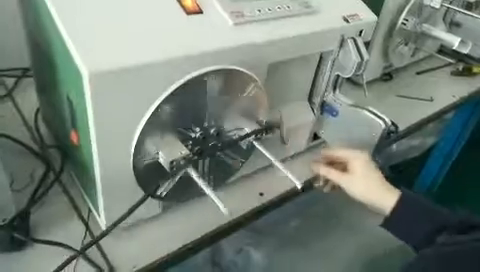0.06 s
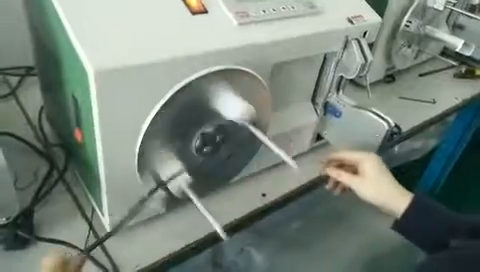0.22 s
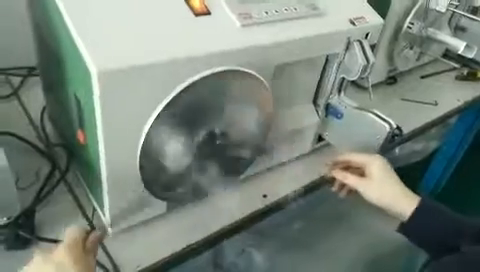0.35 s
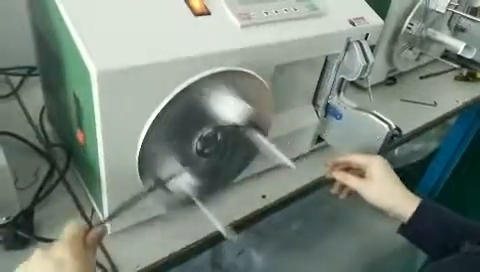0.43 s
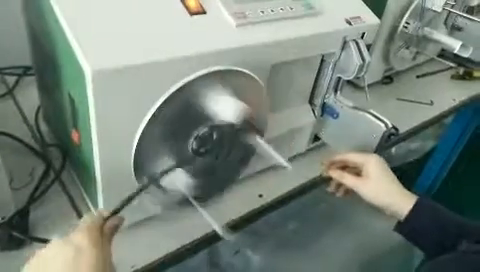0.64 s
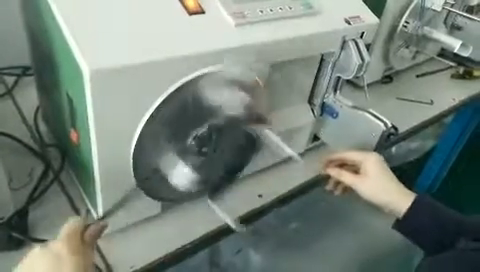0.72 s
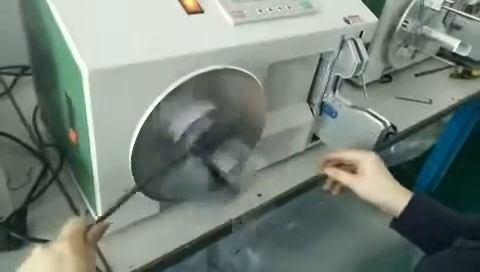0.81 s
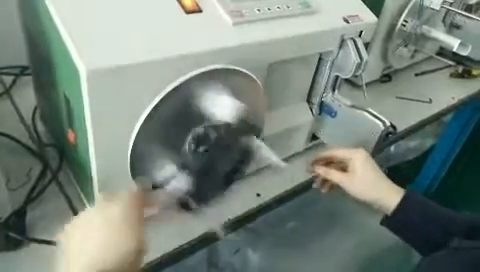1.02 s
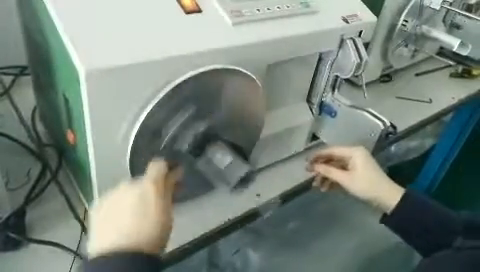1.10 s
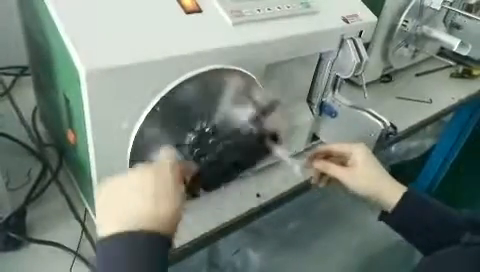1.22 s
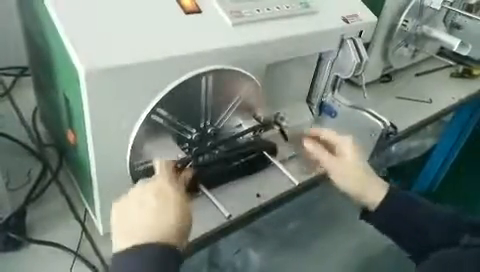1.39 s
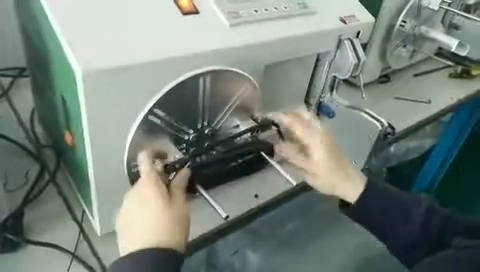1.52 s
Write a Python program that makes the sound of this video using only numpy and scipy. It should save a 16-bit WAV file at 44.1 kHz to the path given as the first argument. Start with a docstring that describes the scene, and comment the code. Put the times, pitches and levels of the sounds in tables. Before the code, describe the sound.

Quick metallic clacking and motor whine from a cable winding machine that runs briefly and stops.

```python
"""A benchtop cable winder ramps up, runs at five turns a second and brakes to a stop.
Its motor and gears whine at multiples of the shaft rate, forcing the cabinet's panels to resonate.
Twice a turn the loose steel arm clacks, hard and soft in turn, and excites the cabinet's low modes.
Friction makes the cable hiss through the hand and brush the coil. The winding head ticks,
a last light click comes as a hand reaches the arm, and the workshop reverberates."""
import sys
import numpy as np
from scipy import signal
from scipy.io import wavfile

SR = 44100
rng = np.random.default_rng(int(sys.argv[2]) if len(sys.argv) > 2 else 0)


def file_out(sig):
    """Save sig as 16-bit WAV at sys.argv[1]."""
    # one column per channel
    cols = np.atleast_2d(sig).T
    # limit, then scale
    lim = np.clip(cols, -1, 1)
    pcm = np.round(lim * 32767).astype(np.int16)
    wavfile.write(sys.argv[1], SR, pcm)


N = 68355
TIME = np.arange(N) / SR


def from_db(db):
    """Amplitude ratio of a level in decibels."""
    return 10 ** (np.asarray(db) / 20)


def rms_one(x):
    """Normalisation to unit rms."""
    return x / np.sqrt(np.mean(x ** 2) + 1e-20)


def at_hz(points, hz):
    """Interpolation on a log-frequency axis."""
    frequencies, values = np.transpose(points)
    return np.interp(np.log(np.maximum(hz, 1)), np.log(frequencies), values)


def drift(rate_hz):
    """Random modulation: low-passed noise of unit rms."""
    r = np.exp(-80 * np.pi * rate_hz / SR)
    slow = signal.lfilter([1], [1, -2 * r, r * r], rng.standard_normal(N // 40 + 2002))[2000:]
    return np.interp(np.arange(N) / 40, np.arange(len(slow)), rms_one(slow))


def ring(x, hz, t60_s):
    """Damped oscillator: a unit impulse starts a decaying sine of amplitude 1."""
    r, w = from_db(-60 / (t60_s * SR)), 2 * np.pi * hz / SR
    return signal.lfilter([0, np.sin(w)], [1, -2 * r * np.cos(w), r * r], x + 1e-18)


def resonate(x, hz, width_hz):
    """Band-pass resonance with unit peak gain."""
    r, w = np.exp(-np.pi * width_hz / SR), 2 * np.pi * hz / SR
    return signal.lfilter(np.array([1, 0, -1]) * (1 - r * r) / 2, [1, -2 * r * np.cos(w), r * r], x)


def dulled(x, top_hz):
    """Low-pass filtering."""
    return signal.sosfilt(signal.butter(4, top_hz, fs=SR, output="sos"), x + 1e-18)


def dying(start_s, fall_s):
    """Exponential decay from a sudden onset."""
    return (TIME >= start_s) * np.exp(-np.abs(TIME - start_s) / fall_s)


def scuff(start_s, length_s):
    """Half-Gaussian envelope: a contact holds briefly and lets go."""
    return (TIME >= start_s) * np.exp(-((TIME - start_s) / length_s) ** 2)


def late(x, lag_s):
    """Propagation delay."""
    return np.interp(TIME - lag_s, TIME, x, left=0)


def placed(x, lag_s=0.000099):
    """Path difference: the machine stands slightly right, so the left channel lags."""
    return np.array([late(x, lag_s), x])


# likeness of left and right: frequency_hz, correlation
STEREO_CORRELATION = [(100, 1), (300, 0.89), (600, 0.89), (1000, 0.27), (1600, -0.47), (3000, -0.18),
                      (5000, -0.079), (12000, 0.039)]

def noise(spectrum, flicker_db=0):
    """Partially coherent stereo noise of unit rms; each third-octave band can flicker on its own."""
    edges = 22 * 2 ** (np.arange(30) / 3)
    out, white = 0, rng.standard_normal((2, 2, N))
    for k, (low, high) in enumerate(zip(edges, edges[1:])):
        band = signal.butter(2, [low, high], "band", fs=SR, output="sos")
        mid, side = signal.sosfilt(band, white[k % 2])
        hz = np.sqrt(low * high)
        alike = np.clip(at_hz(STEREO_CORRELATION, hz), -.99, .99)
        gain = from_db(at_hz(spectrum, hz) + flicker_db * drift(5.3))
        out = out + gain * (np.sqrt(1 + alike) * mid + np.sqrt(1 - alike) * side * [[1], [-1]])
    return rms_one(out)


# workshop background: frequency_hz, density_db
BACKGROUND_SPECTRUM = [(25, -37), (55, 13), (120, 14.5), (280, 18.5), (400, 14.5), (800, 13), (1600, -4),
                       (5500, 3), (9000, -10.5), (16000, -25)]

def background():
    """Ambient noise: a faint, broadband floor."""
    return from_db(-50) * noise(BACKGROUND_SPECTRUM, flicker_db=3)


# cable sliding through the hand: time_s, level_db
SLIDE_LEVELS = [(0, -43), (.05, -36), (.21, -46), (.28, -34), (.44, -37), (.75, -35.5), (1.0, -36.5),
                (1.12, -45), (1.27, -32.5), (1.34, -57), (1.44, -46.5), (1.5, -79)]
# cable brushing the coil: peak_s, level_db, rise_s, fall_s
COIL_BRUSHES = [(0.38, -28.5, 0.012, 0.0076), (0.591, -30.5, 0.003, 0.0095), (1.061, -25.5, 0.036, 0.041),
                (1.165, -45, 0.0017, 0.0084), (1.205, -29, 0.0075, 0.0076), (1.387, -33.5, 0.01, 0.015)]
# friction hiss: frequency_hz, density_db
HISS_SPECTRUM = [(400, -12.5), (1000, -1), (1700, -3.5), (3200, -1.5), (4000, -1), (5600, 2.5),
                 (7500, -14.5), (10000, -16.5), (15000, -25.5)]

def cable():
    """Sliding friction: a grainy hiss in which hand and coil contacts add in power."""
    slide = from_db(np.interp(TIME, *np.transpose(SLIDE_LEVELS)))
    brushes = sum(from_db(db) * np.exp(-np.maximum((peak_s - TIME) / rise_s, (TIME - peak_s) / fall_s))
                  for peak_s, db, rise_s, fall_s in COIL_BRUSHES)
    grain = from_db(1.9 * drift(210))
    return np.hypot(slide, brushes) * grain * noise(HISS_SPECTRUM, flicker_db=3)


# gear tones at full speed: cycles_per_motor_turn, level_db
GEAR_TONES = [(18, -41.5), (20, -38.5), (40, -56)]

def gear_whine(angle, speed):
    """Periodic tooth contact: harmonics of the motor's rotation grow with the square of its speed."""
    tones = sum(from_db(db + 1.7 * drift(35)) * np.sin(order * angle) for order, db in GEAR_TONES)
    whine = np.sqrt(2) * tones * speed ** 2
    return np.array([late(whine, lag_s=0.00044), from_db(-4) * whine])


# thin motor tones: cycles_per_motor_turn, level_db
MOTOR_TONES = [(155, 0.5), (310, -14)]
# how well they radiate: frequency_hz, gain_db
MOTOR_RADIATION = [(300, -65), (900, -45.5), (1400, -43.5), (2200, -53.5), (3300, -33.5), (5000, -40.5),
                   (7750, -54), (16000, -46)]

def motor_whistle(angle, shaft_hz):
    """Radiation efficiency varies with frequency, so the tones swell and fade as they glide."""
    whistle = 0
    for order, db in MOTOR_TONES:
        gain = from_db(db + at_hz(MOTOR_RADIATION, order * shaft_hz) + 2 * drift(60))
        whistle += gain * np.sin(order * angle + drift(110))
    return np.sqrt(2) * whistle * (shaft_hz > 0)


# shaking by the gears, strongest under the load of the ramps: time_s, gain_db
MESH_LOAD = [(.15, -14), (.18, 3), (.22, 6), (.248, 9.5), (.272, 15), (.295, -32), (.45, -3), (1.015, 0.5),
             (1.04, 11), (1.07, 9), (1.11, 2.5)]

def gear_mesh(angle, speed, teeth=20, jitter_rad=.55):
    """Phase and amplitude modulation roughen the meshing force that shakes the panels."""
    phase = teeth * angle + jitter_rad * drift(94)
    force = np.sin(phase) + from_db(-19) * np.sin(2 * phase)
    roughness = from_db(2.5 * drift(105))
    load_db = np.interp(TIME, *np.transpose(MESH_LOAD))
    return from_db(load_db - 42) * rms_one(force * roughness) * (speed > 0)


# panel resonances: pitch_hz, width_hz, gain_db
PANEL_MODES = [(611, 93, 3), (838, 32, 2), (904, 142, 1.5), (1381, 39, 14)]

def panels(force):
    """Forced vibration: the panels sound most when a tone sweeps through a resonance."""
    return sum(from_db(db) * resonate(force, hz, width_hz) for hz, width_hz, db in PANEL_MODES)


def drive(speed, motor_hz=50):
    """Direct and structure-borne radiation of the drive; braking shifts the whistle into the panels."""
    shaft_hz = motor_hz * speed
    angle = 2 * np.pi * np.cumsum(shaft_hz * (1 + 0.002135 * drift(24.4))) / SR
    gears = gear_whine(angle, speed)
    whistle = motor_whistle(angle, shaft_hz)
    braking = TIME > BRAKE_S
    force = gear_mesh(angle, speed) + whistle * from_db(5 * braking)
    return gears + placed(panels(force) + whistle * from_db(-11 * braking))


# spindle rumble: frequency_hz, density_db
RUMBLE_SPECTRUM = [(30, -31), (70, -43), (115, 6.5), (200, 3.5), (310, 3.5), (400, -7), (550, 5),
                   (800, -16), (1500, -26.5)]

def spindle(speed):
    """Rotational noise: a low rumble with amplitude proportional to speed."""
    return from_db(-40.5) * speed * noise(RUMBLE_SPECTRUM, flicker_db=2.5)


# ticks of the winding head: start_s, level_db, fall_s, top_hz
HEAD_TICKS = [(0.165, -38.5, 0.027, 15000), (1.157, -24.5, 0.014, 9900), (1.511, -31, 0.017, 18000)]
# their bright colour: frequency_hz, density_db
TICK_SPECTRUM = [(300, -17), (1500, -5), (3000, 11), (6000, 16), (9000, 11), (15500, 11.5)]

def ticks():
    """Light impacts: broadband transients with exponential decay."""
    grit = noise(TICK_SPECTRUM)
    return sum(dulled(from_db(db) * dying(start_s, fall_s) * grit, top_hz)
               for start_s, db, fall_s, top_hz in HEAD_TICKS)


# impacts of the arm, in relative levels: start_s, ring_db, ping_db, rattle_db, thump_db
ARM_CLACKS = [(0.2417, -12, -29, -8.5, -8), (0.249, -2, -1.5, -10, -14), (0.353, -2.5, -12, -3, 0.5),
              (0.4566, 2, 3, 3, 4.5), (.557, 1, -5.5, -2, 1.5), (0.6578, -2.5, 3.5, -1, 0.5),
              (.754, -0.5, -6.5, -5.5, -3), (0.8563, -1.5, 3, -0.5, -1), (0.9592, -2.5, -5.5, -4.5, -1),
              (1.0636, -5, 8.5, 4.5, 7), (1.246, -13.5, -36, -11, -5.5), (1.275, -39, -21, -11, -17)]
# modes of the steel arm: pitch_hz, level_db, t60_s
ARM_MODES = [(2021, -21.5, 0.22), (2657, -2.5, 0.029), (3149, 4, 0.035), (3354, -7.5, 0.029),
             (4670, -5, 0.025), (5340, -11, 0.049), (5950, -11, 0.024), (6670, -5, 0.042),
             (7500, -3.5, 0.053), (8450, -18, 0.028), (9600, -36, 0.021), (13440, -11, 0.025)]

def arm_ring(detune_hz=90, spread_db=2):
    """Free vibration: the struck arm's modes vary at each clack with how the loose arm sits."""
    hz, mode_db, t60_s = np.transpose(ARM_MODES)
    rings = np.zeros(N)
    for start_s, ring_db, *_ in ARM_CLACKS:
        start = int(start_s * SR)
        age = TIME[:min(N - start, SR // 8), None]
        detune, strength, phase = rng.standard_normal((3, len(hz)))
        modes = np.sin(2 * np.pi * ((hz + detune_hz * detune) * age + phase))
        decay = from_db(-60 * age / t60_s)
        gains = from_db(ring_db + mode_db + spread_db * strength - 20)
        rings[start:start + len(age)] += (modes * decay) @ gains
    return placed(rings)


# rebounds after the hard clacks: start_s, ping_db
ARM_BOUNCES = [(.4641, 0.5), (.4699, -2.5), (.6671, -3), (.6761, -13), (.8643, -2.5), (1.0692, 2),
               (1.0765, 0)]
# ping of a sharp contact: frequency_hz, density_db
PING_SPECTRUM = [(1500, -17), (4000, -26), (5000, 2), (6400, 2), (8000, -11.5), (10000, -42),
                 (12600, -15.5), (16000, -43)]

def arm_ping():
    """Contact noise: each brief clack and rebound radiates a burst of treble."""
    contacts = [(start_s, db) for start_s, _, db, _, _ in ARM_CLACKS] + list(ARM_BOUNCES)
    envelope = sum(from_db(db - 13) * scuff(start_s, length_s=0.0017) for start_s, db in contacts)
    return envelope * noise(PING_SPECTRUM)


# rattle of loose parts: frequency_hz, density_db
RATTLE_SPECTRUM = [(800, -4.5), (1600, -12.5), (2600, -1), (4000, 0), (5000, 4.5), (6400, -1), (10000, -19),
                   (12600, -10), (16000, -38)]

def rattle(delay_s=0.001043):
    """Secondary impacts: loose parts give a grainy burst just after each clack."""
    envelope = sum(from_db(db - 14) * dying(start_s + delay_s, fall_s=0.004)
                   for start_s, _, _, db, _ in ARM_CLACKS)
    grain = rms_one(from_db(1.5 * drift(400)))
    return envelope * grain * noise(RATTLE_SPECTRUM)


# modes of the cabinet: pitch_hz, level_db, t60_s
CABINET_MODES = [(90, -20, 0.54), (117.8, -11, 0.89), (154.7, -13, 0.43), (195.4, -3, 0.54),
                 (246.2, -5.5, 0.5), (263.2, -8, 0.62), (301.3, 2.5, 0.23), (320.9, 1.5, 0.24),
                 (491.4, -1, 0.08), (550, -3, 0.38), (608, -5.5, 0.066), (684, -9, 0.11), (856, -22, 0.12)]

def cabinet(delay_s=0.00215, low_cut_hz=75, spread_db=2):
    """Impulse excitation: each clack makes the cabinet shudder and boom in a new mix of its modes."""
    low_cut = signal.butter(2, low_cut_hz, "high", fs=SR, output="sos")
    pushes = []
    for start_s, *_, thump_db in ARM_CLACKS:
        shudder = dying(start_s + delay_s, fall_s=0.022) * rng.standard_normal(N)
        push = from_db(-6.5) * shudder / np.linalg.norm(shudder)
        push[int((start_s + delay_s) * SR)] += 1  # the impulse itself
        pushes.append(from_db(thump_db - 31.5) * signal.sosfilt(low_cut, push))
    coupling = from_db(spread_db * rng.standard_normal((len(ARM_CLACKS), len(CABINET_MODES))))
    forces = coupling.T @ np.array(pushes)
    boom = sum((-1) ** k * from_db(db) * ring(forces[k], hz, t60_s)
               for k, (hz, db, t60_s) in enumerate(CABINET_MODES))
    return placed(boom, lag_s=0.00017)


# colour of the reflections: frequency_hz, gain_db
ROOM_SPECTRUM = [(60, -17), (330, 1), (600, 9.5), (900, 4), (3000, 2), (6000, 2.5), (9000, -4.5),
                 (16000, 3)]

def workshop(x, delay_s=0.0028, early_db=-7, early_t60_s=0.12, tail_db=-15, tail_t60_s=0.82):
    """Reverberation: dense early reflections from bench and cabinet add in power to the room's tail."""
    power = 0
    for db, t60_s in (early_db, early_t60_s), (tail_db, tail_t60_s):
        decay = dying(delay_s, t60_s / np.log(1000))
        power += (from_db(db) * decay / np.linalg.norm(decay)) ** 2
    response = noise(ROOM_SPECTRUM) * np.sqrt(power)
    return signal.fftconvolve(x[1][None], response, axes=1)[:, :N]


START_S, FULL_SPEED_S, BRAKE_S, STOP_S = 0.016, .285, 1.022, 1.297

def scene():
    """Superposition of machine, cable and room; the speed ramps up, holds and ramps down."""
    speed = np.interp(TIME, [START_S, FULL_SPEED_S, BRAKE_S, STOP_S], [0, 1, 1, 0])
    whine = drive(speed)
    rumble = spindle(speed)
    clacks = dulled(arm_ring() + arm_ping() + rattle(), top_hz=13250)
    boom = cabinet()
    hiss_and_ticks = cable() + ticks()
    room = workshop(clacks + from_db(-0.5) * boom + from_db(-1) * (whine + hiss_and_ticks))
    return whine + rumble + clacks + boom + hiss_and_ticks + room + background()


def record(dry, cutoff_hz=15900):
    """Soft saturation rounds the sharpest peaks; a steep low-pass limits the bandwidth."""
    low_pass = signal.ellip(10, .1, 80, cutoff_hz, fs=SR, output="sos")
    return signal.sosfilt(low_pass, .9 * np.tanh(dry / .9))


dry = scene()
out = record(dry)
file_out(out)
```